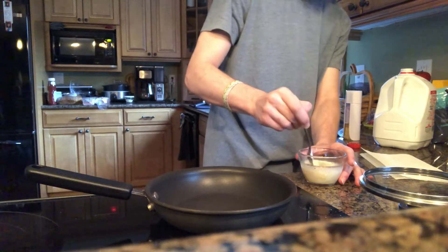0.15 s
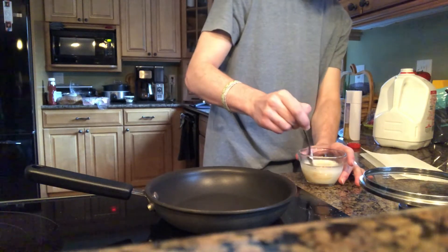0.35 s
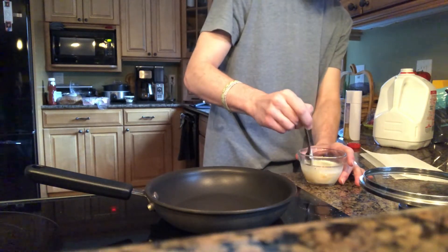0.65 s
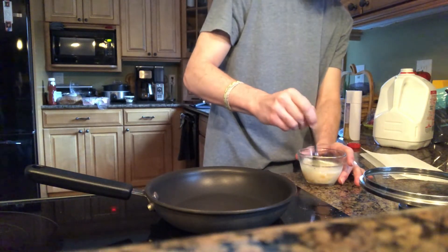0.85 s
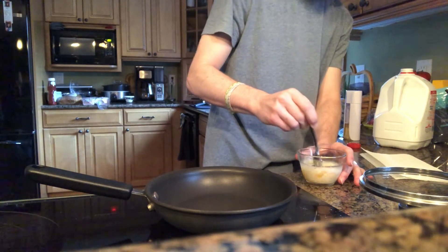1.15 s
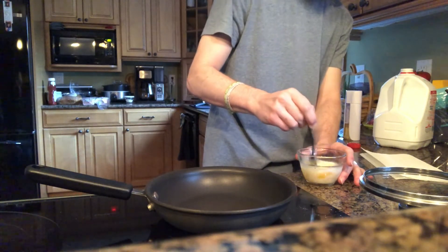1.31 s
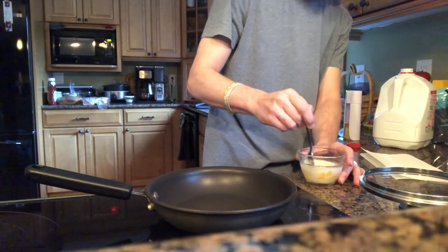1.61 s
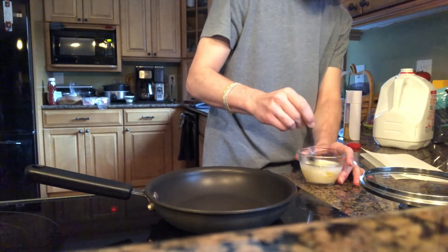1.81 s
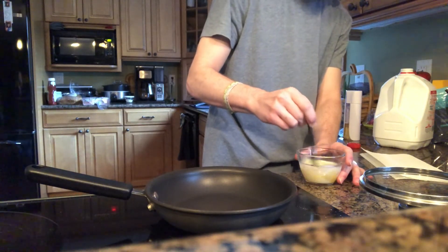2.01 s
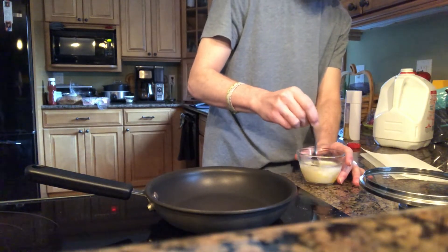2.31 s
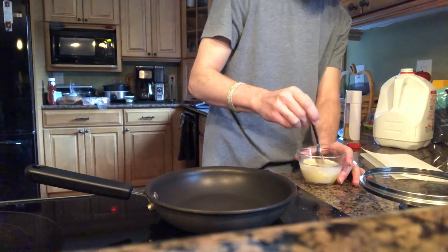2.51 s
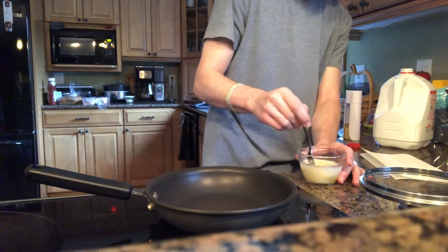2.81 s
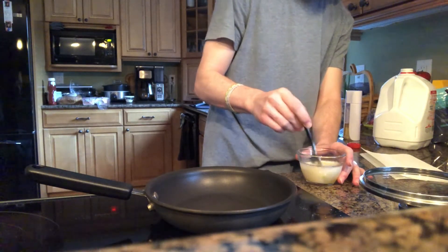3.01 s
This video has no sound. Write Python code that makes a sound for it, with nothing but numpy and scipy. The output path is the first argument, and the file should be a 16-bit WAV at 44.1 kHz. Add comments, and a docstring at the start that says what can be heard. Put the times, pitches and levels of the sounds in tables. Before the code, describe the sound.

A metal fork beats egg and milk in a small glass bowl, close to the microphone. Two ringing clinks and a knock on the counter lead into quick, uneven ticks with dull thumps, over a faint kitchen appliance hum.

```python
"""A kitchen, one microphone close to a small glass bowl held on the stone counter.
A metal fork beats egg and milk in it. Twice the glass rings freely and once it knocks on the counter;
after that the tines tick against the damped wall, each tick followed by a dull, low thump near 330 Hz.
Low shudders come and go under the beating, and farther off the room echoes over an appliance hum."""
import sys
import numpy as np
from scipy import signal
from scipy.fft import rfft, irfft, next_fast_len
from scipy.io import wavfile

SR = 44100
rng = np.random.default_rng(int(sys.argv[2]) if len(sys.argv) > 2 else 0)


def inscribe(sig):
    """Save sig as 16-bit PCM at rate SR to the path in sys.argv[1].

    A 1-D sig is mono; a 2-D sig holds one channel per row.
    Samples are clipped to [-1, 1] before scaling.
    """
    pcm = np.round(np.clip(np.atleast_2d(sig).T, -1, 1) * 32767)
    wavfile.write(sys.argv[1], SR, pcm.astype(np.int16))


N = 138915

# The beating, close to the microphone. Each row: start in seconds, tick and thump levels in dB,
# thump pitch in Hz, thump t60 in seconds, then trims in dB for treble, glass ring and midrange.
STROKES = [(0.7118,-32,-36,327,0.048,4.5,-16,4.5), (0.834,-30.5,-32,329,0.073,2.5,-20,3.5),
           (0.9499,-31.5,-33.5,340,0.026,-5.5,-8,0.5), (0.9848,-29.5,-29.5,319,0.048,0.5,-10,3),
           (1.072,-26.5,-32.5,346,0.061,-0.5,-7,3.5), (1.1258,-27.5,-28,332,0.05,-4.5,-21,-3),
           (1.3635,-33,-34.5,328,0.06,-1.5,-13,1), (1.493,-29.5,-30,310,0.02,-2.5,-6,1),
           (1.5528,-30,-33,339,0.051,-3.5,-10,-2.5), (1.698,-37,-46,328,0.062,-4,-21,-7),
           (1.7909,-36.5,-40,336,0.027,2,-16,0), (1.8325,-29.5,-34.5,320,0.047,6.5,-28,3.5),
           (1.9833,-29.5,-29.5,324,0.038,3,-6.5,3), (2.2118,-26,-35,338,0.043,0.5,-5,1),
           (2.3874,-42.5,-42.5,306,.041,-5,-16,-4), (2.4662,-24.5,-33.5,329,0.047,-2.5,-15,0),
           (2.6232,-24,-35,327,0.094,7,-6,9), (2.8557,-29,-36.5,331,0.084,3.5,-2.5,2.5),
           (3.1249,-32,-44,303,0.054,-3.5,-20,-4.5)]
# The other tines land just behind the first. Each row: lag in seconds, relative level in dB.
REBOUNDS = [(.0025, -3.5), (.0062, -12.5), (.008, -10.5)]
# Tines on wet glass. Each row: mode pitch in Hz, level in dB, t60 in seconds.
TINE_MODES = [(1440, -14.5, 0.032), (1833, -16.5, 0.038), (3023, -17, 0.025), (3680, -22.5, 0.034),
              (4380, -19, 0.056), (5540, -18.5, 0.066), (6282, 0, 0.018), (6564, 4.5, 0.0068),
              (6520, -5.5, 0.0061), (8280, -17.5, 0.066), (10470, -5.5, 0.021), (10910, -5, 0.021),
              (12390, -3, 0.012), (13260, -6, 0.016), (14700, -15, .026), (16180, 0.5, .02)]
# The crack of a tick. Each row: frequency in Hz, gain in dB.
TICK_COLOUR = [(300, -25), (1400, 4.5), (2500, -12), (4000, -9.5), (6500, -0.5), (8000, -5), (11800, -8),
               (13500, -2), (15500, 12.5), (16500, 6)]
MAIN_NOTE_HZ, MIDRANGE_HZ, TREBLE_HZ = 4818, 4770, 9000


def ticks():
    """Tines strike the wet glass one after another: cracks, short modes and a faint ring of the glass."""
    out = np.zeros(N)
    for at, db, _, _, _, treble_db, ring_db, midrange_db in STROKES:
        tone = [(MIDRANGE_HZ, midrange_db), (MIDRANGE_HZ * 1.23, 0),
                (TREBLE_HZ * 0.66, 0), (TREBLE_HZ, treble_db)]
        for lag, rebound_db in [(0.001, 0)] + REBOUNDS:
            crack = undb(-9) * burst(0.019, TICK_COLOUR, size=4096)
            tick = colour(crack + undb(-13.5) * contact_modes(TINE_MODES), tone)
            add(out, at + lag * (1 + 0.13 * rng.standard_normal()), undb(db + rebound_db) * tick)
        add(out, at, undb(db + ring_db - 30) * ring(MAIN_NOTE_HZ, t60=0.27))
    return out


# Faint upper modes of each thump. Each row: mode pitch in Hz, level in dB, t60 in seconds.
THUMP_UPPER_MODES = [(417, -26, 0.12), (746.5, -24.5, 0.12), (1422, -28.5, 0.037)]
THUMP_LAG_S, THUMP_RISE_S, CHOKE_S = 0.00549, 0.0019, 0.048


def thumps():
    """A dull, low thump near 330 Hz comes just after each tick and is quickly choked."""
    out = np.zeros(N)
    size = 8192
    choke = np.exp(-(np.arange(size) / SR / CHOKE_S) ** 3)
    for at, _, db, hz, t60, *_ in STROKES:
        thump = ring(hz, t60, THUMP_RISE_S, size)
        for mode_hz, mode_db, mode_t60 in THUMP_UPPER_MODES:
            detune = 1 + 0.048 * rng.standard_normal()
            thump += undb(mode_db) * ring(mode_hz * detune, mode_t60, THUMP_RISE_S, size)
        add(out, at + THUMP_LAG_S, undb(db + 10.5) * choke * thump)
    return out


def light_thump():
    """A dull, low thump near 330 Hz just after a clink or graze, gone at once."""
    return ring(328, t60=0.013, rise=THUMP_RISE_S)


# The free glass, up close. Each row: start in seconds, contact and ring levels in dB,
# ring length as a factor, tilt in dB per octave, trim of the main note in dB.
CLINKS = [(0.2353, -24, -23, 0.87, -0.1, -7), (0.3764, -32.5, -32.5, 0.73, -0.7, 9)]
# Each entry: the pitch of one glass mode in Hz.
GLASS_HZ = (1897, 1965, 2094, 4732, 4818, 8682, 8810, 13690)
# Those modes, in the same order. Each row: level in dB, t60 in seconds.
GLASS_MODES = [(-7.5, 0.046), (-9.5, 0.15), (-5.5, 0.036), (-1.5, 0.054), (-13.5, 0.24), (-8.5, 0.079),
               (4, 0.06), (-4.5, 0.046)]
# The contact noise of a clink. Each row: frequency in Hz, gain in dB.
CLINK_COLOUR = [(100, -31.5), (330, 9.5), (1100, -10.5), (2100, 3.5), (2700, -10.5), (3500, -2.5),
                (4200, -13.5), (5200, 0), (7000, 1), (9500, -6), (13500, -8.5), (14500, -14),
                (16000, -13.5)]


def clinks():
    """The fork hits high on the wall and the glass rings in close pairs of modes."""
    out = np.zeros(N)
    for at, contact_db, ring_db, length, tilt_db, note_db in CLINKS:
        glass = 0
        for hz, (db, t60) in zip(GLASS_HZ, GLASS_MODES):
            trim_db = tilt_db * np.log2(hz / MAIN_NOTE_HZ) + note_db * (hz == MAIN_NOTE_HZ)
            glass += undb(db + trim_db) * ring(hz, t60 * length, rise=0.00098)
        add(out, at, undb(ring_db) * glass + undb(contact_db) * burst(0.029, CLINK_COLOUR))
        add(out, at + THUMP_LAG_S, undb(contact_db - 15) * light_thump())
    return out


# The thump of the one knock. Each row: mode pitch in Hz, level in dB, t60 in seconds.
KNOCK_MODES = [(328, -1, 0.068), (729, -7, 0.062), (1363, -19, 0.036)]


def knock(at=0.2785):
    """The foot of the bowl cracks on the stone, and a dull thump follows."""
    out = np.zeros(N)
    crack_colour = [(100, -43), (400, 1.5), (1400, 10), (2400, 0), (3400, 0), (5000, -8), (12000, -61)]
    thump = sum(undb(db) * ring(hz, t60, rise=0.0035) for hz, db, t60 in KNOCK_MODES)
    add(out, at, undb(-32.5) * burst(0.072, crack_colour))
    add(out, at + 0.0045, undb(-15.5) * thump)
    return out


# Light touches of one tine. Each row: start in seconds, level in dB.
GRAZES = [(0.6608,-39), (0.82,-37), (1.2727,-33), (1.286,-46.5), (1.358,-39.5), (1.6719,-42), (1.83,-43),
          (2.093,-38.5), (2.106,-55), (2.276,-44.5), (2.533,-39.5), (2.994,-32.5)]
# A tine ringing freely. Each row: mode pitch in Hz, level in dB, t60 in seconds.
FREE_TINE_MODES = [(6070, -9, 0.027), (6130, -9.5, 0.036), (7050, 7.5, 0.0087), (7300, -28.5, 0.025),
                   (8350, -24.5, .028), (8400, -11, 0.074), (10700, -9, 0.015), (11900, -0.5, 0.011),
                   (13300, -12.5, 0.017), (14800, -11, .015)]
# The thin crack of a graze. Each row: frequency in Hz, gain in dB.
GRAZE_COLOUR = [(1500, -12), (4800, -51), (6500, 23), (9500, 4), (12000, 12), (16000, 18)]


def grazes(skip_s=0.0021, fall_db=6):
    """A tine skips along the wall and pings three times, weaker at each touch."""
    out = np.zeros(N)
    for at, db in GRAZES:
        for touch in range(3):
            ping = undb(-10.5) * contact_modes(FREE_TINE_MODES)
            crack = undb(-19) * burst(0.02, GRAZE_COLOUR, size=4096)
            lag = touch * skip_s * (0.5 + rng.random())
            add(out, at + lag, undb(db - touch * fall_db) * (ping + crack))
        add(out, at + THUMP_LAG_S, undb(db + 4) * light_thump())
    return out


# Metal scraping glass, faint even this close. Each row: frequency in Hz, gain in dB.
SLIDE_COLOUR = [(1200, -19), (2000, -11.5), (2400, 10), (2900, -11), (6000, -15.5), (8000, -5),
                (9000, -8.5), (11000, -22)]


def slide(start_s=0.15, length_s=0.081):
    """The fork slides on the wall with a grainy scrape before the first clink."""
    swell = np.sin(np.pi * np.clip((np.arange(N) / SR - start_s) / length_s, 0, 1))
    grains = rng.standard_normal(N) * rng.exponential(size=N)
    return undb(-72) * colour(grains * np.sqrt(abs(swell)), SLIDE_COLOUR)


# Deep bass at the microphone. Each row: start in seconds, level in dB.
SHUDDERS = [(.845, -32.5), (0.998, -43), (1.142, -33.5), (1.261, -38), (1.39, -41), (1.569, -40.5),
            (1.698, -46), (1.849, -33.5), (1.999, -42), (2.123, -32.5), (2.232, -48), (2.478, -45),
            (3.022, -38)]


def shudders():
    """Low 60 Hz shudders come and go under the beating."""
    out = np.zeros(N)
    for at, db in SHUDDERS:
        hz = 60.6 * (1 + 0.022 * rng.standard_normal())
        add(out, at, undb(db) * ring(hz, t60=0.24, rise=0.004))
    return out


# Worktop, wall and cupboards. Each row: delay at the microphone in seconds, relative level in dB.
ECHOES = [(.0021, -24), (.0058, -14.5), (0.0145, -18)]


def echoes(x):
    """Each nearby surface throws back one weaker copy."""
    out = np.zeros(N)
    for lag, db in ECHOES:
        add(out, lag, undb(db) * x)
    return out


# The room around the microphone. Each row: band centre in Hz, level in dB, t60 in seconds.
REVERB_BANDS = [(324, -16, 0.97), (1010, -6.5, 0.37), (2500, -9, 0.4), (6000, -12, 0.28), (9300, -14, 0.23),
                (15100, -13, 0.14)]


def kitchen_reverb(x, size=32768):
    """The room answers with a diffuse tail that dies faster in the treble."""
    log_hz = np.log(np.fft.rfftfreq(size, 1 / SR) + 1)
    centres = np.log([row[0] for row in REVERB_BANDS])
    noise = rfft(rng.standard_normal(size))
    tail = 0
    for share, (_, db, t60) in zip(np.eye(len(REVERB_BANDS)), REVERB_BANDS):
        band = irfft(noise * np.interp(log_hz, centres, share))
        envelope = fade(t60, size) * (1 - fade(0.12, size))
        tail += undb(db) * band * envelope / np.linalg.norm(envelope)
    return signal.fftconvolve(x, tail)[:N]


# The air of the room. Each row: frequency in Hz, gain in dB.
AIR_COLOUR = [(24, -26.5), (40, 3.5), (109, 0), (176, -4), (283, -4), (337, -1.5), (444, 1.5), (491, -3.5),
              (680, -2), (1090, -12), (1240, -17.5), (2380, -27.5), (4460, -34.5), (4930, -35), (6170, -38),
              (8990, -41.5), (16000, -45)]
# An appliance in the background. Each row: pitch in Hz, level in dB.
HUM_TONES = [(60, -59), (120, -65.5), (152, -65.5), (180, -64.5), (241, -67), (428, -64), (541, -67),
             (662, -63.5), (703, -64)]


def room_tone():
    """Steady air noise and the hum of an appliance, each tone wandering in phase."""
    t = np.arange(N) / SR
    hum = 0
    for hz, db in HUM_TONES:
        drift = np.cumsum(rng.standard_normal(N)) * hz * 4e-5
        hum += undb(db) * np.sqrt(2) * np.sin(2 * np.pi * hz * t + drift)
    return undb(-50.5) * colour(rng.standard_normal(N), AIR_COLOUR) + hum


def undb(db):
    return 10 ** (np.asarray(db) / 20)


def add(out, at, sound):
    """Mixes a sound in at a time in seconds."""
    i = int(at * SR)
    out[i:i + len(sound)] += sound[:N - i]


def colour(x, points):
    """Filters by a (Hz, dB) curve, causally and with unit power gain."""
    size = next_fast_len(2 * len(x), real=True) // 2 * 2
    hz, db = np.array(points).T
    log_hz = np.log(np.fft.rfftfreq(size, 1 / SR) + 1)
    cepstrum = irfft(np.log(undb(np.interp(log_hz, np.log(hz), db))))
    cepstrum[1:size // 2] *= 2  # minimum phase: nothing sounds ahead of a hit
    cepstrum[size // 2 + 1:] = 0
    response = np.exp(rfft(cepstrum))
    return irfft(rfft(x, size) * response / np.sqrt(np.mean(abs(response) ** 2)))[:len(x)]


def fade(t60, size):
    """Exponential decay, 60 dB down after t60 seconds."""
    return np.exp(-np.log(1000) * np.arange(size) / SR / max(t60, 1e-3))


def ring(hz, t60, rise=1e-4, size=22050):
    """One mode that swells and dies away."""
    t = np.arange(size) / SR
    return np.sin(2 * np.pi * hz * t) * fade(t60, size) * (1 - np.exp(-(t / rise) ** 2))


def burst(t60, points, size=22050):
    """Brief coloured contact noise."""
    return colour(rng.standard_normal(size) * fade(t60, size), points)


def contact_modes(table, spread_db=3, detune=0.007):
    """Short modes, weighted and tuned a little differently at each contact."""
    chance = rng.standard_normal((len(table), 2))
    return sum(undb(db + spread_db * louder) * ring(hz * (1 + detune * sharper), t60, size=4096)
               for (hz, db, t60), (louder, sharper) in zip(table, chance))


def scene():
    """At the microphone: fork and bowl in front, the kitchen behind them."""
    bright = ticks() + grazes() + clinks() + slide()
    dull = signal.sosfilt(signal.butter(2, 184, "high", fs=SR, output="sos"), thumps() + knock())
    direct = bright + dull
    heard = direct + echoes(bright) + kitchen_reverb(direct) + shudders() + room_tone()
    return heard[None]


def record(dry):
    """The recorder cuts the deepest bass and the top."""
    thin = signal.sosfilt(signal.butter(4, 51, "high", fs=SR, output="sos"), dry)
    return signal.sosfilt(signal.ellip(8, 0.2, 70, 15750, fs=SR, output="sos"), thin)


dry = scene()
out = record(dry)
inscribe(out)
```